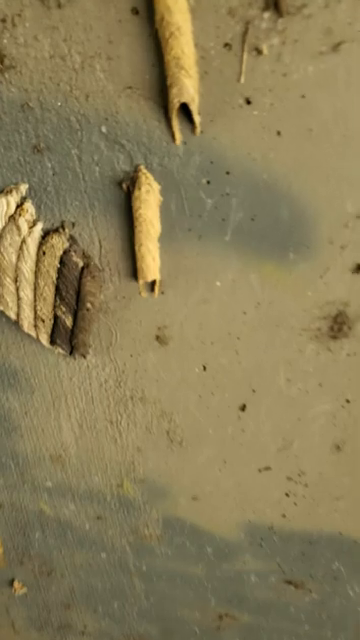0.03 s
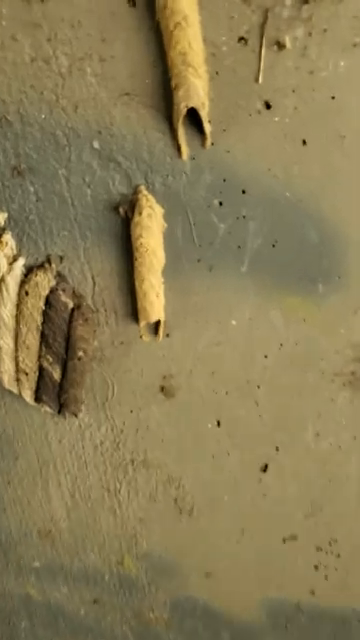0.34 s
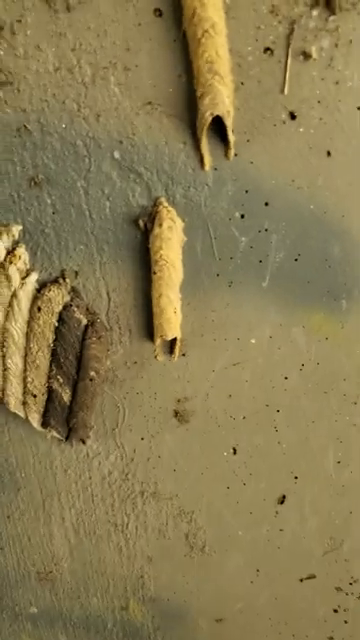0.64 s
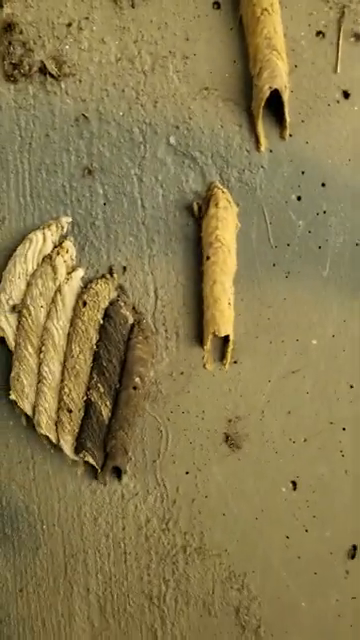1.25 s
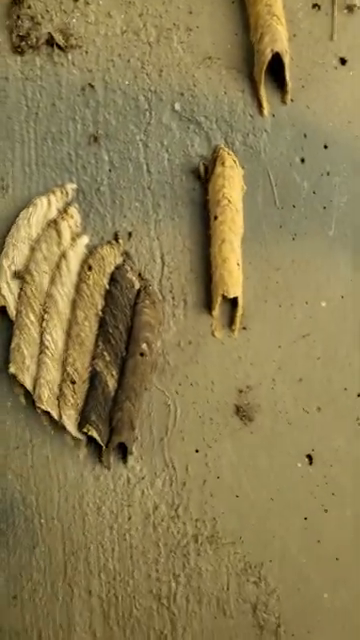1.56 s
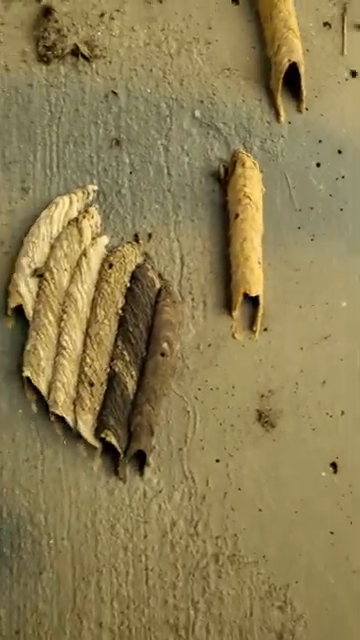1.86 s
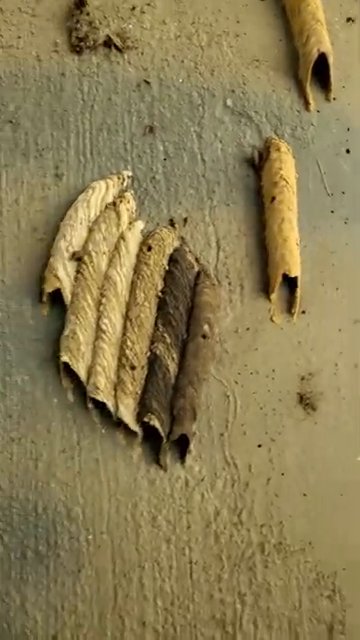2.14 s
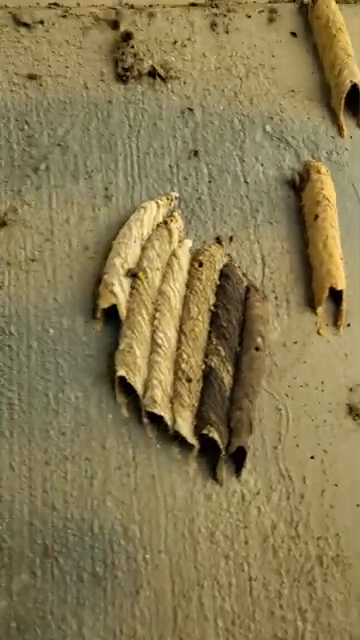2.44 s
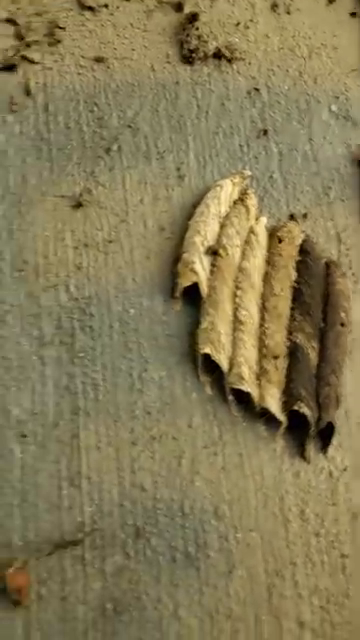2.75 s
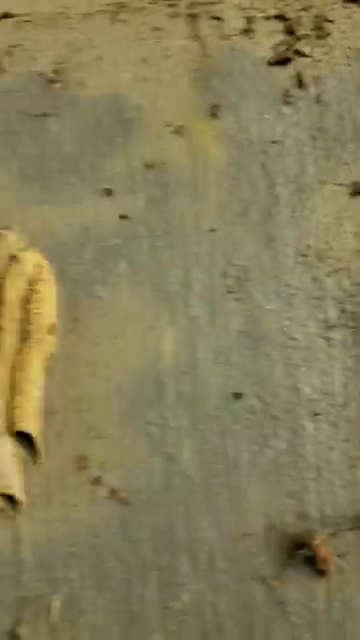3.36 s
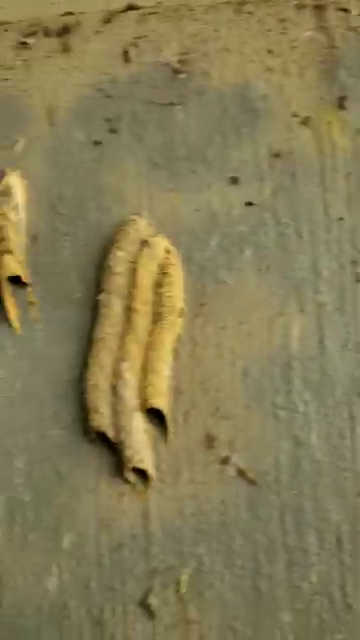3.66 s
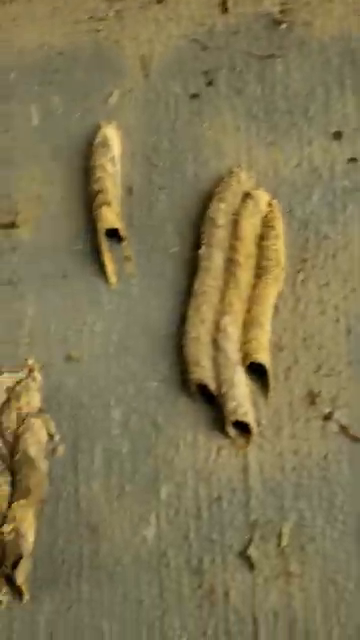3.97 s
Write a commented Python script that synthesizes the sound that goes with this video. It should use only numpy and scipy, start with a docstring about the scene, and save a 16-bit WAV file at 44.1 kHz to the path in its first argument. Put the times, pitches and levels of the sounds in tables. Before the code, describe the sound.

Outdoors beside a wall, a low engine drone rises and dips over far traffic and a thin, sinking whine. Before the midpoint, fingers make a soft rub and two clicks by the microphone, with barely audible chirps behind.

```python
"""A heavy engine drones low, surging at its firing rate, outdoors beside a wall.
Distant traffic rumbles and slowly swells; far machines hum; a thin whine, probably tyres, sinks.
Fingers shift on a camera's case with a soft rub and a few clicks.
Very faint high chirps and hiss flicker, mostly on the right."""
import sys
import numpy as np
from scipy import signal
from scipy.fft import rfft, irfft, next_fast_len
from scipy.io import wavfile
from scipy.ndimage import uniform_filter1d, map_coordinates

SR = 44100
rng = np.random.default_rng(int(sys.argv[2]) if len(sys.argv) > 2 else 0)


def pcm_store(signal):
    """Save signal as 16-bit PCM."""
    levels = np.round(np.clip(np.atleast_2d(signal), -1, 1) * 32767)
    wavfile.write(sys.argv[1], SR, levels.astype(np.int16).T)


N = 176400

# engine surges (time [s], relative level [dB])
ENGINE_DB = [(.12, -51.5), (.55, -36.5), (.92, -42), (1.16, -27.5), (1.25, -38.5), (1.45, -28.5),
             (1.54, -31), (1.63, -29), (1.74, -27), (1.83, -41), (1.95, -26.5), (2.05, -24.5), (2.11, -35),
             (2.18, -22), (2.27, -26.5), (2.35, -35), (2.45, -28), (2.57, -26), (2.68, -41), (2.85, -29),
             (3.05, -37.5), (3.16, -29), (3.24, -30.5), (3.3, -20), (3.4, -45), (3.62, -26), (3.73, -34.5),
             (3.81, -27), (4.0, -25.5)]
# engine firing (time [s], rate [Hz])
FIRING_HZ = [(.12, 85), (1.05, 81), (1.75, 89.1), (2.1, 86.07), (2.45, 87.76), (2.8, 85.3), (3.35, 81.82),
             (3.55, 80), (3.8, 87.36), (4.0, 86.9)]

# traffic rumble (time [s], relative level [dB])
RUMBLE_DB = [(.12, -43), (.4, -39), (.95, -43.5), (1.35, -39.5), (1.8, -41.5), (2.3, -39.5), (2.65, -35),
             (3.05, -37), (3.32, -36), (3.65, -37), (3.85, -37), (4.0, -29.5)]
# rumble spectrum (frequency [Hz], density [dB])
RUMBLE_COLOUR_DB = [(10, -32), (24, -23.5), (32, 1.5), (48, 2.5), (57, 1.5), (72, 4.5), (105, -1),
                    (135, -7), (170, -19), (400, -82.5)]
# road roar (time [s], relative level [dB])
ROAR_DB = [(.12, -52.5), (.6, -50.5), (1.0, -49), (1.5, -47), (2.0, -46.5), (2.6, -46), (3.3, -46),
           (4.0, -45.5)]
# roar spectrum (frequency [Hz], density [dB])
ROAR_COLOUR_DB = [(60, 4), (130, 9.5), (230, 5.5), (310, 1), (450, -1), (580, 2), (780, 1), (1050, -1.5),
                  (1500, -9), (2200, -17), (3300, -22.5), (4800, -32.5), (6300, -38.5), (7400, -52.5),
                  (9000, -49), (16000, -55)]
# roar left-right likeness (frequency [Hz], correlation [0..1])
ROAR_CORRELATION = [(130, 0.91), (290, 0.96), (640, 0.4), (1100, 0.32), (1600, 0), (3000, 0)]
# roar balance (frequency [Hz], left minus right [dB])
ROAR_TILT_DB = [(100, 15), (220, 2), (700, 3), (1300, 0), (2400, 6.5), (4400, 17.5), (6500, -30), (9000, 3)]

# far drones (pitch [Hz], width [Hz], peak level [dB], peak time [s], sigma [s])
HUMS = [(172.5, 9, -48, 1.61, .6), (195.5, 10, -46.5, 1.39, 0.56), (233, 23, -48.5, 3.63, 1.87),
        (114.9, 20, -40.5, 1.96, 0.48), (186, 38, -50, 0.54, 0.32), (321.3, 50, -52, 3.02, 0.95),
        (852, 130, -53.5, 0.42, 0.4)]
# motor hum (time [s], level [dB])
MOTOR_DB = [(.12, -53.5), (.55, -47.5), (2.1, -51), (2.6, -45.5), (3.6, -43), (4.0, -46.5)]
# whine (time [s], pitch [Hz], level [dB])
WHINE = [(.12, 669.7, -56), (.75, 668.3, -53.5), (.97, 661.3, -45.5), (1.15, 667.7, -50),
         (1.43, 653.3, -46.5), (1.63, 657.6, -49.5), (1.87, 673, -47), (2.15, 655.6, -45),
         (2.35, 663.7, -46.5), (2.51, 656.4, -49), (2.61, 636.4, -40), (2.78, 642, -53), (3.0, 634, -46.5),
         (3.2, 643.7, -48.5), (3.48, 619.5, -51), (3.76, 629, -47), (4.0, 641, -74)]

# case clicks (time [s], gain [dB], left minus right [dB], thud gain re click [dB])
CLICKS = [(0.317, -38, -11, -7), (1.4210, -28, 9.5, -17.5), (1.6662, -19, -32, -4)]
# case modes, click (frequency [Hz], relative level [dB], T60 [s])
CLICK_MODES = [(2180, -17, .003), (4510, -1.5, 0.00077), (9200, -13, 0.0011), (13400, -19.5, .001)]
# case modes, thud (frequency [Hz], relative level [dB], T60 [s])
THUD_MODES = [(144, 7.5, 0.017), (680, 3.5, 0.0074)]
# finger rubs (time [s], sigma [s], level [dB], left minus right [dB])
RUBS = [(.267, .0015, -62, -3), (1.421, .0015, -56, 4), (1.503, .016, -57, 0), (1.53, .26, -64, -8)]
# rub spectrum (frequency [Hz], density [dB])
RUB_COLOUR_DB = [(1000, -14), (3000, -15.5), (4500, -0.5), (7000, -7.5), (9000, -3.5), (11000, -8),
                 (16000, -7)]

# high chirps (time [s], gain [dB], sweep re echo [dB])
CHIRPS = [(0.151, -61.5, -1.5), (0.247, -63, -9), (.334, -63, -6), (.424, -66.5, 3), (.755, -71, -6),
          (.805, -69, -3.5), (.89, -72, -15), (.968, -64.5, -2), (1.02, -67, -7.5), (1.943, -67, -6),
          (2.02, -69.5, -2.5), (2.143, -65, -8.5), (2.215, -65, 0), (2.305, -62.5, -8), (2.36, -62.5, -3.5),
          (2.448, -63, -8.5), (2.536, -61.5, -0.5), (2.74, -62, -12.5), (2.784, -64.5, -10),
          (2.845, -63.5, -8.5), (2.942, -61, -12.5), (3.03, -65, -11.5), (3.1, -61.5, -12.5),
          (3.148, -67.5, -8.5), (3.24, -62.5, -6), (3.328, -61.5, -8), (3.375, -66, -9),
          (3.618, -67.5, -2.5), (3.668, -64, -1.5), (3.745, -74.5, -2), (3.91, -74.5, -9)]
# chirp echo spectrum (frequency [Hz], density [dB])
ECHO_COLOUR_DB = [(3000, -37.5), (5500, -17), (7400, -26), (9600, -14), (10600, 1), (13000, 5),
                  (15000, 3.5), (16000, 2)]
# lisping notes (time [s], pitch [Hz], level [dB])
LISPS = [(.185, 5400, -73), (.276, 5260, -66), (.562, 4970, -65.5), (2.273, 4850, -60), (3.25, 5734, -69),
         (3.333, 5460, -61.5), (3.39, 6040, -64.5), (3.505, 4800, -64)]
# airy wash (time [s], level [dB])
WASH_DB = [(.12, -65.5), (.46, -79), (.62, -73.5), (.92, -64), (1.3, -69), (2.0, -69), (2.4, -62),
           (2.8, -61.5), (3.3, -64), (3.65, -69.5), (4.0, -67)]
# wash spectrum (frequency [Hz], density [dB])
WASH_COLOUR_DB = [(1200, -4.5), (2300, 1), (3300, 1), (5000, -1), (6500, -8), (7400, -25), (9000, -16),
                  (16000, -25.5)]
# high hiss (time [s], level [dB])
HISS_DB = [(.12, -91), (.72, -82), (.85, -69), (1.05, -70), (1.9, -71.5), (2.4, -73), (2.68, -82.5),
           (2.8, -73), (3.25, -77.5), (3.46, -102), (4, -88)]
# hiss spectrum (frequency [Hz], density [dB])
HISS_COLOUR_DB = [(3000, -37), (5500, -16), (7400, -24.5), (9600, -15.5), (10600, 1.5), (13000, 5),
                  (16000, -0.5)]


def engine(tone_db=-4.5, boom_db=-8.5, drift_hz=2, boom_width_hz=19):
    """Surging firing tone inside a boom smeared by the surroundings."""
    level_db, = curves(ENGINE_DB)
    firing_hz, = curves(FIRING_HZ)
    tone = unit(sine(firing_hz + drift_hz * wobble(11)))
    boom = spread(fuzzy_tone(firing_hz, boom_width_hz), 0.96)
    return amp(level_db) * (amp(tone_db) * tone + amp(boom_db) * boom) * pan(.1)


def traffic_rumble(gain_db=3):
    """Deepest part of the traffic, near mono."""
    level_db, = curves(RUMBLE_DB)
    return spread(noise(RUMBLE_COLOUR_DB), 1) * amp(level_db + gain_db) * pan(0.34)


def road_roar(gain_db=7.5, waver_db=.5):
    """Broadband far traffic, diffuse in the treble."""
    level_db, = curves(ROAR_DB)
    hz = np.fft.rfftfreq(N, 1 / SR)
    spectrum = spread(rfft(noise(ROAR_COLOUR_DB)), along(ROAR_CORRELATION, hz))
    roar = irfft(spectrum * pan(along(ROAR_TILT_DB, hz)), N)
    return unit(roar) * amp(level_db + gain_db + waver_db * wobble(6.7))


def far_hums():
    """Narrowband drones of machines and traffic; each swells and fades."""
    t, out = clock(), np.zeros((2, N))
    for hz, width_hz, db, peak_s, sigma_s in HUMS:
        out += spread(fuzzy_tone(hz, width_hz), 0.77) * amp(db) * gaussian(t - peak_s, sigma_s)
    return out * pan(1.4)


def far_motor(pitch_hz=168.5, drift_hz=.7):
    """Steady motor: one nearly clean tone, growing clearer."""
    level_db, = curves(MOTOR_DB)
    return unit(sine(pitch_hz + drift_hz * wobble(5))) * amp(level_db)


def whine(core_db=-2.5, skirt_db=-3, waver_hz=2.8, skirt_width_hz=26):
    """Probably tyres: thin sinking tone with a noise skirt."""
    hz, level_db = curves(WHINE)
    core = unit(sine(hz + waver_hz * np.array([wobble(22.04), wobble(22)])))
    pair = amp(core_db) * core + amp(skirt_db) * fuzzy_tone(hz, skirt_width_hz)
    return spread(pair, 0.65) * amp(level_db) * pan(1.7)


def fingers_on_case(thud_tilt_db=-3):
    """Dry clicks with small thuds from the case modes; soft friction noise."""
    t, out = clock(), np.zeros((2, N))
    age_s = np.arange(SR // 10) / SR
    for start_s, db, tilt_db, thud_db in CLICKS:
        click = ring(CLICK_MODES, age_s) * pan(tilt_db)
        thud = amp(thud_db) * ring(THUD_MODES, age_s) * pan(thud_tilt_db)
        start = round(start_s * SR)
        out[:, start:start + len(age_s)] += amp(db) * (click + thud)
    for peak_s, sigma_s, db, tilt_db in RUBS:
        out += amp(db) * gaussian(t - peak_s, sigma_s) * noise(RUB_COLOUR_DB) * pan(tilt_db)
    return out


def chirps(top_hz=16000, fall_hz_per_s=110000, width_hz=380,
           attack_s=.0049, sigma_s=.014, echo_t60_s=.3, tilt_db=-13):
    """Perhaps an insect or small bird: fast fuzzy down-sweeps with a diffuse echo."""
    age_s, out = np.arange(SR // 4) / SR, np.zeros((2, N + SR))
    rasp = speckled(noise(ECHO_COLOUR_DB), depth_db=5)
    fuzz = filtered(rng.standard_normal((2, N)), lambda hz: np.exp(-(hz / width_hz) ** 2))
    fuzz = np.array([unit(channel) for channel in fuzz])
    attack = 1 - np.exp(-age_s / attack_s)
    for start_s, db, sweep_db in CHIRPS:
        at = round(start_s * SR) + np.arange(len(age_s))
        start_hz = top_hz * (1 + .025 * rng.standard_normal())
        sweep_hz = np.maximum(start_hz - fall_hz_per_s * age_s, top_hz / 2)
        sweep = np.sqrt(2) * fuzz[:, at % N] * sine(sweep_hz) * gaussian(age_s, sigma_s)
        echo = amp(-60 * age_s / echo_t60_s) * rasp[:, at % N]
        out[:, at] += amp(db) * attack * (amp(sweep_db) * sweep + echo)
    return out[:, :N] * pan(tilt_db)


def lisps(width_hz=600, sigma_s=.008, tilt_db=-3):
    """Perhaps a distant bird: short, faint notes of narrowband noise."""
    t, out = clock(), np.zeros((2, N))
    fuzz = unit(filtered(rng.standard_normal((2, N)), lambda hz: gaussian(hz, width_hz)))
    for peak_s, pitch_hz, db in LISPS:
        carrier = np.sqrt(2) * np.sin(2 * np.pi * pitch_hz * (t - peak_s))
        out += amp(db) * gaussian(t - peak_s, sigma_s) * carrier * fuzz
    return out * pan(tilt_db)


def airy_wash(flutter_db=1.8, flutter_hz=23, tilt_db=-1):
    """Soft treble noise, coming and going above the roar."""
    level_db, = curves(WASH_DB)
    grain = speckled(noise(WASH_COLOUR_DB), depth_db=3.5)
    return grain * amp(level_db + flutter_db * wobble(flutter_hz)) * pan(tilt_db)


def hiss(flicker_db=2, flicker_hz=35, tilt_db=-12):
    """Faint flicker in the highest treble."""
    level_db, = curves(HISS_DB)
    grain = speckled(noise(HISS_COLOUR_DB), depth_db=4.5)
    return grain * amp(level_db + flicker_db * wobble(flicker_hz)) * pan(tilt_db)


def amp(db):
    """dB to gain."""
    return 10 ** (np.asarray(db) / 20)


def unit(x):
    """Scale to rms 1."""
    return x / np.sqrt(np.mean(np.abs(x) ** 2) + 1e-20)


def clock():
    """Sample times [s]."""
    return np.arange(N) / SR


def sine(hz):
    """Sine from per-sample frequency."""
    return np.sin(2 * np.pi * np.cumsum(hz, axis=-1) / SR)


def gaussian(x, sigma):
    """Bell curve, peak 1."""
    return np.exp(-(x / sigma) ** 2 / 2)


def along(points, hz):
    """Interpolate over log frequency."""
    knots_hz, values = np.transpose(points)
    return np.interp(np.log(hz + 1), np.log(knots_hz + 1), values)


def curves(rows):
    """Per-sample curve for each column after time."""
    times_s, *columns = np.transpose(rows)
    return [np.interp(clock(), times_s, column) for column in columns]


def wobble(rate_hz):
    """Smooth random curve, knots at rate_hz."""
    return map_coordinates(rng.standard_normal(2048), [clock() * rate_hz + 3], mode="mirror")


def pan(tilt_db):
    """Constant-power gains from left minus right level."""
    half_db = np.atleast_1d(tilt_db) / 2
    gains = amp([half_db, -half_db])
    return gains / np.sqrt(np.mean(gains ** 2, axis=0))


def spread(pair, correlation):
    """Mix two independent signals to a given left-right correlation."""
    angle = np.arccos(np.clip(correlation, -1, 1)) / 2
    mid, side = pair[0] * np.cos(angle), pair[1] * np.sin(angle)
    return np.array([mid + side, mid - side])


def filtered(x, response):
    """Zero-phase FFT filter, gain response(hz)."""
    size = next_fast_len(N + SR // 2)
    return irfft(rfft(x, size) * response(np.fft.rfftfreq(size, 1 / SR)), size)[..., :N]


def noise(colour_db):
    """Two independent noises, same spectrum."""
    return unit(filtered(rng.standard_normal((2, N)), lambda hz: amp(along(colour_db, hz))))


def fuzzy_tone(hz, width_hz):
    """Two independent narrowband noises around a pitch."""
    carrier = np.exp(2j * np.pi * np.cumsum(hz + np.zeros(N)) / SR)
    envelopes = [wobble(2 * width_hz) + 1j * wobble(2 * width_hz) for _ in range(2)]
    return np.array([unit(np.real(carrier * envelope)) for envelope in envelopes])


def ring(modes, age_s):
    """Damped modes, struck at age 0."""
    return sum(amp(db - 60 * age_s / t60_s) * np.sin(2 * np.pi * hz * age_s) for hz, db, t60_s in modes)


def speckled(pair, depth_db):
    """Random gain in small time-frequency patches."""
    spectra = signal.stft(pair, nperseg=256)[2]
    patches = uniform_filter1d(rng.standard_normal(spectra.shape), size=3, axis=1)
    patches = uniform_filter1d(patches, size=5, axis=2)
    spectra *= amp(depth_db * unit(patches))
    return unit(signal.istft(spectra, nperseg=256)[1][:, :N])


def scene():
    """Engine and traffic all around, fingers close by, faint high sounds."""
    outdoors = road_roar() + airy_wash() + traffic_rumble() + engine() + far_motor() + far_hums()
    return outdoors + whine() + fingers_on_case() + hiss() + chirps() + lisps()


def record(dry, start_s=.112, fade_s=.003, cutoff_hz=16000):
    """Fast fade in and out, brick-wall low-pass."""
    t = clock()
    fade = np.clip(np.minimum(t - start_s, t[-1] - t) / fade_s, 0, 1)
    return filtered(dry * fade, lambda hz: hz < cutoff_hz)


dry = scene()
out = record(dry)
pcm_store(out)
```